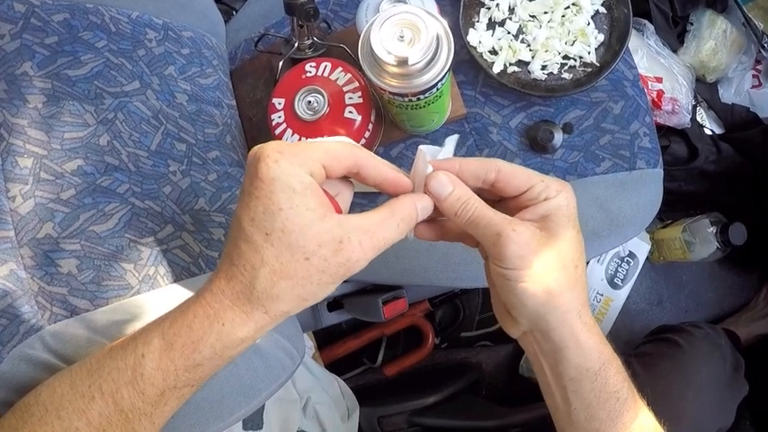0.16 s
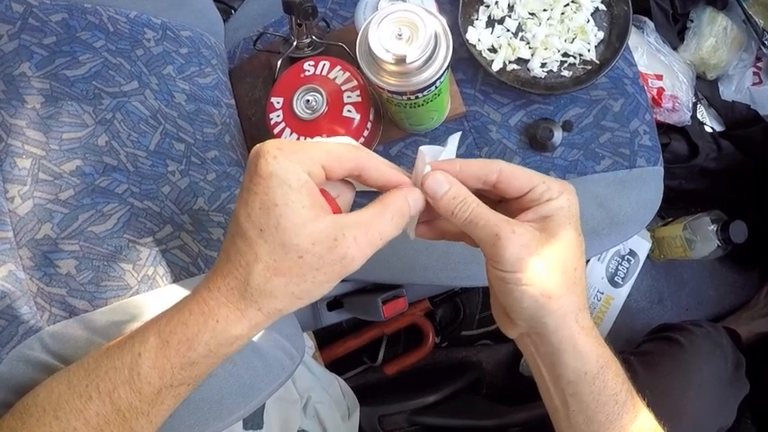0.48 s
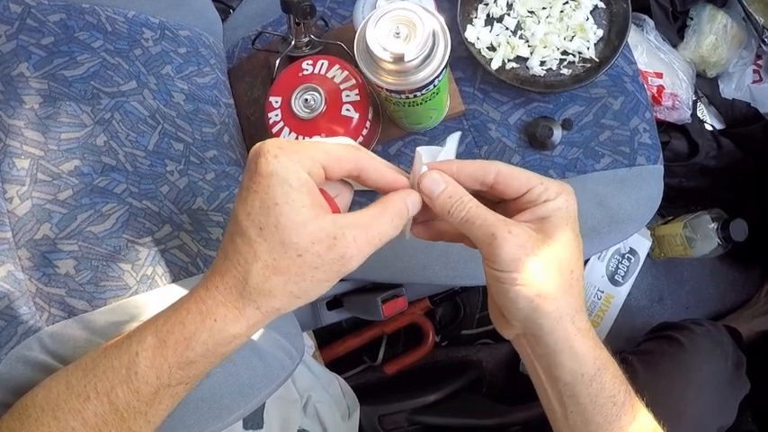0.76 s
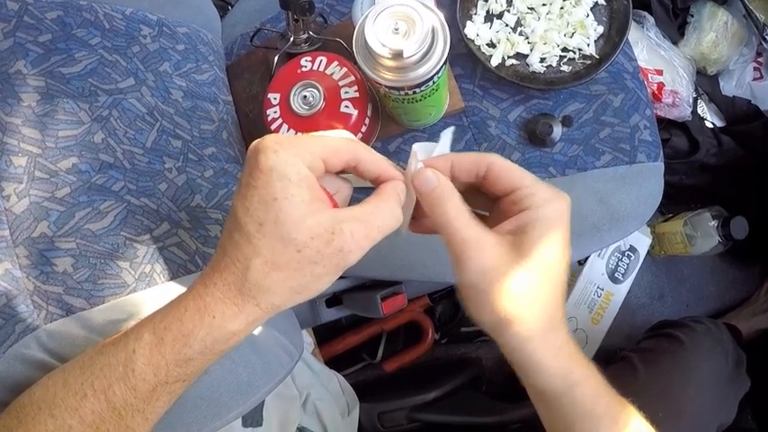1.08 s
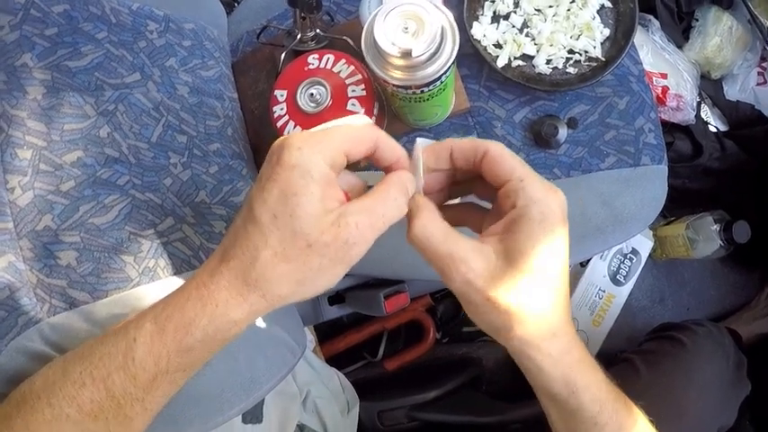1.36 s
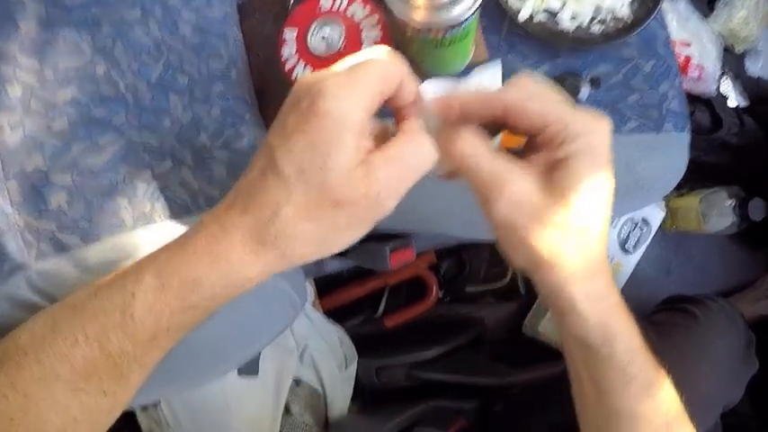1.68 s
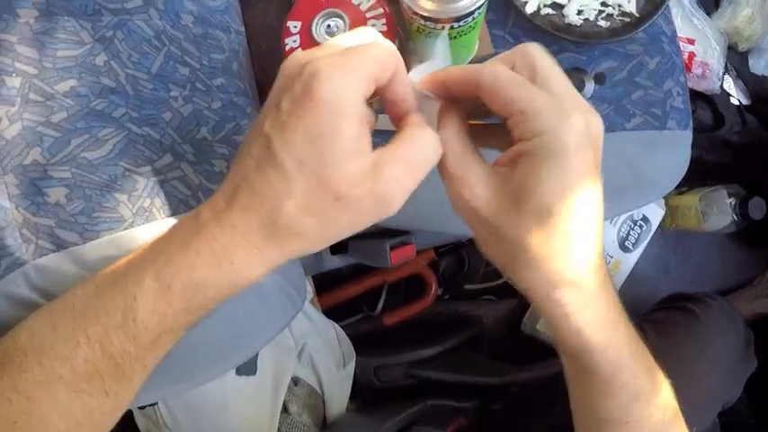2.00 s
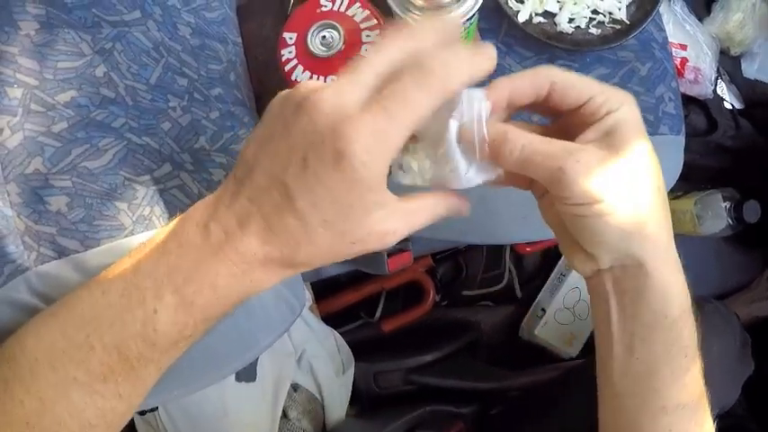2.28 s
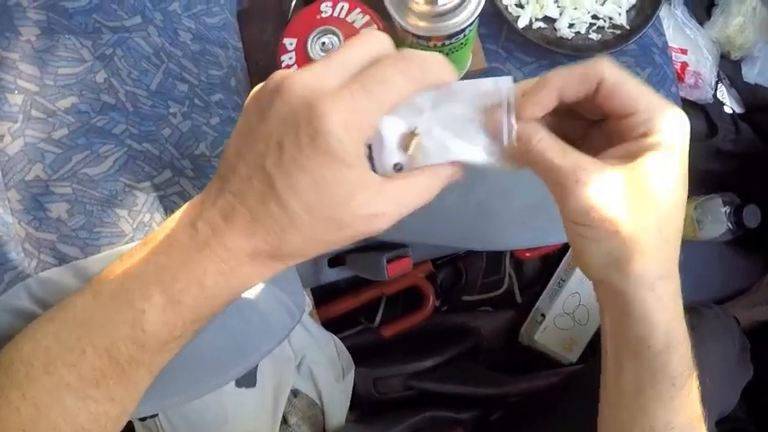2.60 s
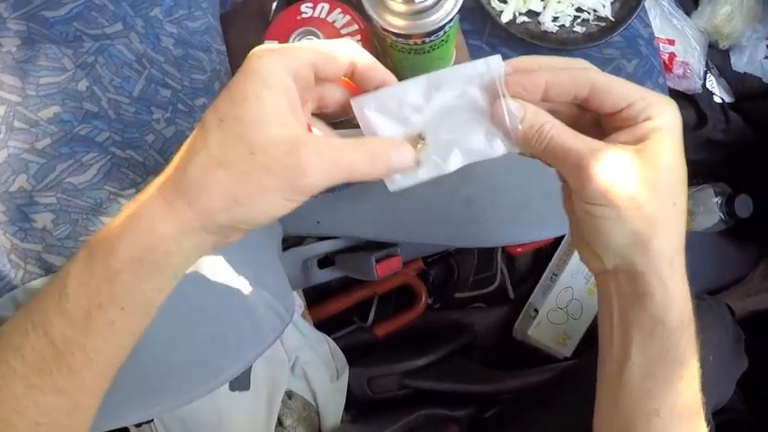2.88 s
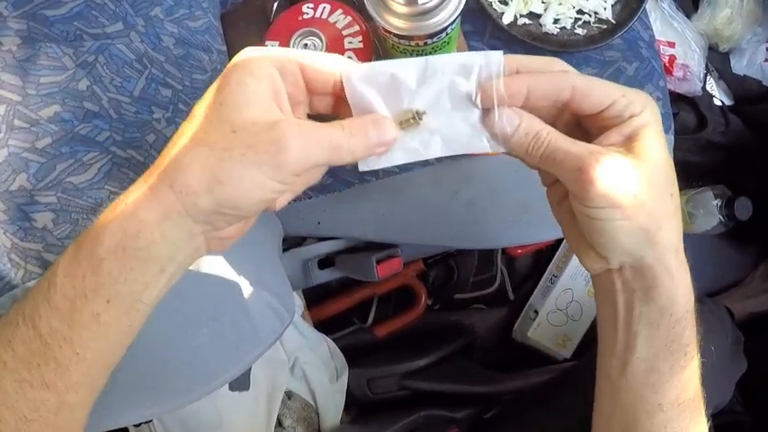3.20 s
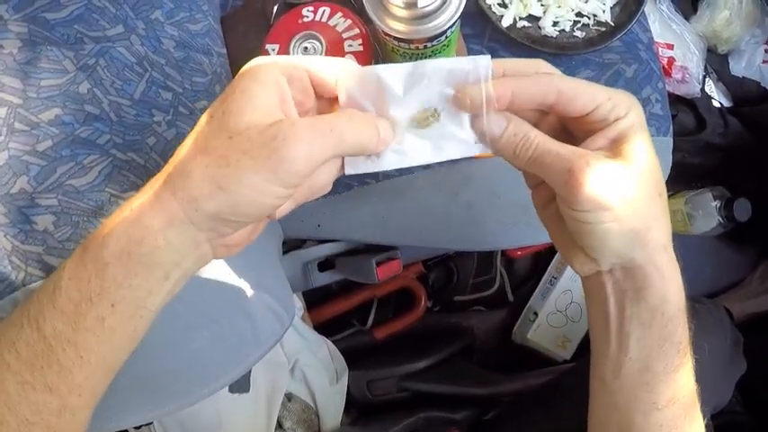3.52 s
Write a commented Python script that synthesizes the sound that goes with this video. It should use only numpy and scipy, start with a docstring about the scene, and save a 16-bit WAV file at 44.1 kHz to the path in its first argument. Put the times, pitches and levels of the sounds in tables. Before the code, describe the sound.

Thin plastic film crackles in short, bright snaps as fingers peel open and stretch a little packet.

```python
"""A small plastic packet is picked at, peeled open and stretched flat by fingers inside a parked car.
Its film buckles in short snaps: bursts of slips ring the creases and die quickly in the upholstered cabin.
Fingertips rub and slide (showers of tiny slips), bump (soft buckles) and thud (damped low rings); a crease pings.
Underneath lie a faint hiss and outside noise (coloured noise), a low throb like a far idling engine
(two wavering sines) and air stirring at the microphone (very low noise)."""
import sys
import numpy as np
from scipy import signal
from scipy.fft import rfft, irfft
from scipy.io import wavfile

SR = 44100
rng = np.random.default_rng(int(sys.argv[2]) if len(sys.argv) > 2 else 0)


def digitize_waveform(pressure):
    """Quantize a signal to 16-bit integers and store it at the path in sys.argv[1].

    Rows of a 2-D input are taken as channels; values are limited to [-1, 1].
    """
    field = np.atleast_2d(pressure).T
    bounded = np.clip(field, -1, 1)
    quanta = np.round(bounded * 32767).astype(np.int16)
    wavfile.write(sys.argv[1], SR, quanta)


N = 160965  # length in samples

# Levels in the tables are relative: the *_DB settings below raise or lower whole layers.
# colour of the steady hiss: f/Hz, level/dB
HISS_COLOUR = [(2500, -21), (3500, -21.5), (4400, -17.5), (5400, -4.5), (7300, -0.5), (10000, -9),
               (12500, -24.5), (15500, -26)]
# colour of the outside noise: f/Hz, level/dB
OUTSIDE_COLOUR = [(110, 4), (160, -2.5), (220, -3), (330, -7), (550, -13), (950, -5), (1250, -12),
                  (1700, -17), (2500, -30)]
# faint wavering tones in the outside noise: f/Hz
STREAK_TONES = [732, 929, 1064, 1270]
# course of the low throb: t/s, level of the fundamental/dB, level of the octave/dB
THROB_COURSE = [(0.0, -46, -56.5), (0.41, -54, -76), (2.39, -48.5, -58), (2.68, -52, -65.5),
                (3.12, -45, -53.5), (3.6, -42.5, -57), (3.65, -51, -49)]
# colour of the air stirring at the microphone: f/Hz, level/dB
AIR_COLOUR = [(6, -10.5), (12, -2.5), (22, -9.5), (45, -12), (62, -29), (130, -42)]
# course of skin rubbing on the film: t/s, level of the dull scuff/dB, level of the fine crackle/dB
RUB_COURSE = [(1.0, -90, -84), (1.11, -68, -77), (1.51, -79, -72.5), (1.64, -94, -86), (1.78, -64, -68),
              (1.91, -56, -56.5), (2.01, -51, -56), (2.17, -72, -69), (2.31, -61.5, -55), (2.46, -55, -57),
              (2.58, -57, -58), (2.76, -64, -61), (2.87, -52.5, -62), (2.98, -64, -62), (3.06, -63, -79),
              (3.19, -57.5, -52), (3.24, -59, -66), (3.38, -62.5, -66), (3.49, -55.5, -49.5),
              (3.61, -57.5, -63), (3.65, -66, -90)]
# colour of the dull scuff: f/Hz, level/dB
SCUFF_COLOUR = [(110, -3.5), (170, 0.5), (260, -3), (400, -0.5), (550, 1), (750, -2.5), (900, -1),
                (1200, -6), (1700, -8.5), (2800, -27.5)]
# colour of the fine crackle: f/Hz, level/dB
CRACKLE_COLOUR = [(1400, -8), (2600, -12.5), (4200, -0.5), (5300, -5.5), (8000, -7.5), (11000, -15.5),
                  (15000, -19)]
# airy rustles of film sliding between fingertips: middle t/s, half length t/s, level/dB
SLIDE_EVENTS = [(0.541, 0.009, -60.5), (1.36, 0.048, -58)]
# colour of the slides: f/Hz, level/dB
SLIDE_COLOUR = [(5000, 2), (10000, 0), (13000, 0), (15000, -5)]
# dull thuds of the finger pads: t/s, f/Hz, level/dB
THUD_EVENTS = [(0.675, 348, -54), (0.715, 485, -56.5), (0.753, 485, -57), (1.105, 483, -47.5),
               (1.15, 515, -57), (1.285, 980, -54), (1.315, 336, -48.5), (1.474, 540, -53),
               (2.356, 726, -45), (2.435, 610, -33), (2.86, 410, -32.5), (2.996, 544, -36.5),
               (3.117, 510, -43), (3.207, 935, -39)]
# soft bumps and small ticks under the fingers: t/s, then level/dB in the body, mid and ring bands
BUMP_EVENTS = [(1.102, -57, -53, -59), (1.154, -65, -58.5, -80), (1.197, -51, -42, -49.5),
               (1.316, -52.5, -55, -68), (1.329, -57, -57, -63), (1.52, -70, -60, -62),
               (1.561, -60, -56, -62), (1.606, -60, -55, -67), (1.769, -77, -56, -73),
               (1.825, -59, -48, -45), (2.011, -48, -40, -43), (2.036, -51, -50, -72),
               (2.049, -46, -43, -49), (2.205, -50, -55, -58), (2.307, -44.5, -51, -45.5),
               (2.366, -54, -49, -58), (2.515, -66, -43, -52), (2.619, -67, -51.5, -50),
               (2.694, -54, -53, -55), (2.712, -45.5, -45, -47), (2.768, -43.5, -45, -50),
               (2.795, -58, -57, -57), (2.819, -57, -56, -50), (2.867, -53, -58, -66),
               (2.9569, -41.5, -49, -46), (3.142, -40.5, -50, -43), (3.247, -66, -49.5, -57),
               (3.309, -58, -62, -57), (3.422, -53, -58, -54), (3.516, -39.5, -49, -44),
               (3.519, -39, -48, -45), (3.532, -44, -45.5, -45)]
# snaps of the film: t/s, buckling time/ms, ring f/Hz, then level/dB in the body, mid, ring, bright and top bands
SNAP_EVENTS = [(0.347, 0.31, 5150, -63, -51, -42, -45.5, -50),
               (0.3732, 0.64, 5060, -66, -54, -50.5, -48, -51),
               (0.3951, 0.95, 7540, -64, -76, -48.5, -44, -48),
               (0.8321, 0.16, 5000, -79, -59.5, -52, -54, -53.5),
               (0.8794, 1.9, 4400, -68, -73, -54, -53, -53), (1.0846, 2.7, 4970, -65, -64, -56, -64, -74),
               (1.2086, 3.3, 4270, -50.5, -47.5, -48, -57, -60),
               (1.38, 0.41, 4800, -58, -48.5, -47.5, -44.5, -40.5),
               (1.6786, 1.6, 4760, -47.5, -41, -32, -29.5, -31.5),
               (1.7042, 0.25, 5130, -68, -55.5, -28.5, -33, -40),
               (1.7284, 0.33, 4180, -69, -61, -52, -53, -58),
               (1.8163, 0.21, 3900, -61, -65, -48.5, -41.5, -40.5),
               (1.8427, 1.1, 4170, -63, -41.5, -36.5, -40, -52),
               (1.86, 0.69, 4450, -46.5, -43, -34, -60, -55),
               (1.8649, 0.58, 5500, -51, -40.5, -48, -41, -44),
               (1.8765, 0.74, 5900, -50, -42, -35, -43, -48),
               (1.9459, 0.69, 4900, -51.5, -47, -49.5, -66, -76),
               (1.9551, 6, 5000, -68, -52, -44.5, -49.5, -69),
               (1.9875, 2.8, 4860, -50, -40.5, -38.5, -43, -51),
               (1.9943, 2.6, 4400, -52, -43, -40, -41, -46),
               (2.058, 0.59, 4940, -78, -55, -50.5, -47.5, -52),
               (2.0774, 0.27, 4250, -44, -45.5, -49, -51, -59),
               (2.086, 10, 4900, -55, -47.5, -41, -51, -53), (2.11, 1.2, 3980, -42.5, -41.5, -39, -42, -49),
               (2.1363, 0.26, 4500, -51, -49, -40, -61, -62),
               (2.2295, 1.9, 5500, -58, -51.5, -44.5, -45.5, -43),
               (2.2757, 0.15, 3210, -78, -59, -47, -56, -60),
               (2.3735, 2.6, 4750, -53, -71, -51.5, -53.5, -71), (2.3905, 1, 5300, -52, -43, -37, -48, -55),
               (2.418, 2.6, 4970, -46, -46, -41.5, -48.5, -51),
               (2.4298, 0.58, 4300, -42.5, -46, -37.5, -45.5, -59),
               (2.4446, 2.4, 5540, -40, -38.5, -37, -40, -40),
               (2.4588, 0.56, 4300, -34.5, -41.5, -34, -47.5, -62),
               (2.4738, 0.4, 4350, -37.5, -31.5, -21.5, -26.5, -30.5),
               (2.4785, 0.51, 4190, -36, -54, -43, -46, -48), (2.4845, 0.33, 5900, -57, -47, -35, -42, -39),
               (2.4888, 0.88, 4900, -52, -40.5, -27.5, -31.5, -46),
               (2.498, 0.34, 3960, -36, -36.5, -37, -56, -48),
               (2.522, 1.6, 4500, -74, -46, -42.5, -62, -69),
               (2.5686, 2.2, 4170, -51, -51, -48.5, -74, -76), (2.5844, 1.1, 6050, -58, -57, -60, -55, -54),
               (2.6825, 0.49, 3850, -75, -55, -48.5, -49.5, -48),
               (2.7059, 1.1, 4670, -55, -58, -51, -52, -52),
               (2.7265, 0.66, 5300, -45.5, -42.5, -40.5, -41.5, -46),
               (2.7383, 0.94, 4030, -44.5, -46.5, -42.5, -52, -64),
               (2.752, 1.3, 4000, -53, -41.5, -37.5, -38.5, -38.5),
               (2.755, 2.2, 4070, -43, -45.5, -39, -39, -51), (2.833, 0.53, 4150, -47, -49, -48, -62, -62),
               (2.8604, 0.54, 4470, -45, -44, -43, -44.5, -47),
               (2.886, 1.5, 3630, -41.5, -45, -33.5, -45.5, -52),
               (2.9121, 1.8, 6000, -56, -52, -39.5, -39.5, -54),
               (2.942, 1.2, 3800, -52, -52, -44, -70, -75), (2.952, 0.42, 4260, -51, -51, -57, -53, -51),
               (2.9657, 0.33, 5200, -50, -51, -43.5, -43, -55),
               (2.9723, 0.49, 4400, -48.5, -46, -43, -61, -63),
               (3.0116, 2.4, 4400, -39.5, -36.5, -34.5, -37.5, -47),
               (3.0247, 0.25, 4200, -45, -43.5, -39, -51, -61),
               (3.034, 1.3, 4350, -52, -43.5, -34.5, -40, -50),
               (3.1502, 0.7, 4200, -49, -45.5, -29.5, -38, -43),
               (3.1627, 1, 4950, -39, -36, -26.5, -31, -27),
               (3.203, 0.62, 4200, -53, -50, -45.5, -48.5, -58),
               (3.2855, 0.56, 4770, -56, -54, -51, -57.5, -71),
               (3.395, 2.1, 4270, -46, -43, -30.5, -32.5, -28.5),
               (3.454, 0.6, 5800, -58, -44.5, -32.5, -35, -42),
               (3.5732, 2.5, 4360, -56, -50.5, -43, -50.5, -64),
               (3.6061, 0.41, 4400, -73, -58, -44, -50, -58)]
# edges of the body, mid, ring, bright and top bands: low f/Hz, high f/Hz
BAND_EDGES = [(265, 1000), (1000, 2700), (3400, 6300), (6300, 10000), (10000, 15500)]
# the cabin's answer in each band: time to fall by 60 dB t/s, level against the direct snap/dB, band trim level/dB
CABIN_BANDS = [(0.035, -2.5, -0.5), (0.058, 2.5, -1.5), (0.057, -5.5, 0.5), (0.053, -3, 2),
               (0.045, -6, -1.5)]
# resonances shared by the whole packet, shifted a little at each buckle: f/Hz, width f/Hz, level/dB
FILM_MODES = [(4200, 1900, -7), (7870, 570, 12), (10660, 170, -9.5), (12400, 420, 4)]
# low resonances of the hands and the cabin around them, alike at every buckle: f/Hz, width f/Hz, level/dB
HOLLOW_MODES = [(351, 43, 5), (515, 94, 7.5), (743, 147, 11), (1058, 142, 4), (1183, 100, 3), (1436, 77, 6)]

HISS_DB, OUTSIDE_DB, STREAK_DB, AIR_DB = -63, -69.5, -83, -47
SWELL_DB, SWELL_HZ = 2.5, 1.7  # size and speed of the swell in the outside noise
STREAK_WIDTH_HZ = 16
THROB_HZ, THROB_DB = 38.2, 2.5
THROB_PAN_DB, AIR_PAN_DB = -5.5, -34  # left minus right

SCUFF_DB, SCUFF_PER_S, SCUFF_SPREAD_DB = -5.5, 700, 3
CRACKLE_DB, CRACKLE_PER_S, CRACKLE_SPREAD_DB = -3.5, 420, 6.5
RUB_ECHO_DB, RUB_ECHO_DECAY_S = -2.5, 0.019
SLIDE_PER_S = 1900
THUD_ATTACK_S, THUD_DECAY_S = 0.00041, 0.006
THUD_ROUGH = 0.75  # share of rough ring against one share of pure tone
PING_S, PING_HZ, PING_T60_S, PING_DB = 2.391, 2100, 0.03, -36

BUMP_MS, BUMP_HZ, BUMP_DB = 3.1, 4400, 21.5
SNAP_DB = 26.5
FIRST_SLIP = 0.44  # strength of the opening slip in a short buckle
RUN_SPREAD_DB = 2  # unevenness of the small slips after it
RING_WIDTH_HZ, RING_DB = 580, 10  # the buckling crease's own resonance
FILM_SPREAD = 0.061  # random shift of the film's resonances, as a fraction of pitch
CABIN_ONSET_S, CABIN_SPREAD_DB = 0.0018, 3.5  # build-up and unevenness of the reflections
SIDE_DB, SIDE_HZ, SIDE_DECAY_S = -11.5, 307, 0.0016  # low reflections that add width
CEILING = 0.33  # level at which the recorder rounds the peaks
TOP_HZ = 15200


def amp(db):
    """Turn decibels into a gain."""
    return 10 ** (np.asarray(db) / 20)


def unit(x):
    """Scale a sound to an energy of one."""
    return x / np.sqrt(np.sum(x ** 2) + 1e-18)


def curve(table, column):
    """Gain over time, drawn in straight dB lines through one column of a table."""
    rows = np.array(table)
    return amp(np.interp(np.arange(N) / SR, rows[:, 0], rows[:, column]))


def colour(x, points):
    """Filter through (f/Hz, level/dB) points with steep skirts, never acting ahead of time; the rms becomes 1."""
    hz, db = np.array(points).T
    log_f = np.log(np.maximum(np.fft.rfftfreq(2 * N, 1 / SR), 1))
    below = np.maximum(np.log(hz[0]) - log_f, 0)
    above = np.maximum(log_f - np.log(hz[-1]), 0)
    level_db = np.interp(log_f, np.log(hz), db) - np.minimum(40 * (below + above), 70)
    # folding the cepstrum (the spectrum of the log gain) makes the filter act only forwards in time
    cepstrum = irfft(np.log(amp(level_db)))
    cepstrum[1:N] *= 2
    cepstrum[N + 1:] = 0
    response = np.exp(rfft(cepstrum))
    return unit(irfft(rfft(x, 2 * N) * response)[:N]) * np.sqrt(N)


def noise(points):
    """Coloured noise of rms 1."""
    return colour(rng.standard_normal(N), points)


def wander(hz):
    """Random drift of rms 1, made mostly of changes slower than hz."""
    f = np.fft.rfftfreq(N, 1 / SR)
    smooth = irfft(rfft(rng.standard_normal(N)) * np.exp(-(f / hz) ** 2), N)
    return unit(smooth) * np.sqrt(N)


def grains(per_s, spread_db):
    """Tiny slips at random moments, most weak and a few strong."""
    size = amp(spread_db * np.minimum(rng.exponential(size=N), 4))
    happens = rng.random(N) < per_s / SR
    return happens * size * rng.choice([-1, 1], N)


def resonance(size, hz, width, db):
    """Frequency response of one damped resonance, with its peak at the given level."""
    s = 1j * np.fft.rfftfreq(size, 1 / SR)
    return amp(db) * s * width / (s ** 2 + s * width + hz ** 2)


def pan(x, db):
    """Place a sound by its left-minus-right level."""
    gains = amp(np.array([[db], [-db]]) / 2)
    return x * gains / gains.mean()


def add(out, start_s, x):
    """Mix a sound in at its time."""
    i = int(start_s * SR)
    out[i:i + len(x)] += x[:max(N - i, 0)]


def hiss():
    """Steady noise shaped into a faint hiss."""
    return amp(HISS_DB) * noise(HISS_COLOUR)


def outside():
    """Faint outside noise that swells and sinks, with a few wavering tones in it."""
    t = np.arange(N) / SR
    streaks = np.zeros(N)
    for hz in STREAK_TONES:
        waver = wander(STREAK_WIDTH_HZ) + 1j * wander(STREAK_WIDTH_HZ)  # drifts in strength and phase
        streaks += np.real(waver * np.exp(2j * np.pi * hz * t))
    swell = amp(OUTSIDE_DB + SWELL_DB * wander(SWELL_HZ))
    return swell * noise(OUTSIDE_COLOUR) + amp(STREAK_DB) * streaks


def throb():
    """A low tone and its octave, like a far idling engine, with a slightly unsteady pitch."""
    pitch = THROB_HZ * (1 + 0.022 * noise([(1, 1.5), (5, -3.5)]))
    phase = 2 * np.pi * np.cumsum(pitch) / SR
    fundamental = curve(THROB_COURSE, 1) * np.sin(phase)
    octave = curve(THROB_COURSE, 2) * np.sin(2 * phase)
    return pan(amp(THROB_DB) * (fundamental + octave), THROB_PAN_DB)


def air():
    """Slow buffets of air at the microphone: very low noise, almost all on the right."""
    return pan(amp(AIR_DB) * noise(AIR_COLOUR), AIR_PAN_DB)


def rubbing():
    """Skin sticks and slips on the film: a dull scuff and fine crackle, echoed by the cabin."""
    t = np.arange(N) / SR
    touching = np.clip((t - RUB_COURSE[0][0]) * 10, 0, 1)  # fades in over a tenth of a second
    scuff = colour(grains(SCUFF_PER_S, SCUFF_SPREAD_DB), SCUFF_COLOUR)
    crackle = colour(grains(CRACKLE_PER_S, CRACKLE_SPREAD_DB), CRACKLE_COLOUR)
    scuff = amp(SCUFF_DB) * curve(RUB_COURSE, 1) * scuff
    crackle = amp(CRACKLE_DB) * curve(RUB_COURSE, 2) * crackle
    rub = touching * (scuff + crackle)
    cabin = unit(rng.standard_normal(N) * np.exp(-t / RUB_ECHO_DECAY_S))
    return rub + amp(RUB_ECHO_DB) * signal.fftconvolve(rub, cabin)[:N]


def slides():
    """Film slides between the fingertips: dense tiny slips make thin, airy rustles that rise and fall."""
    t = np.arange(N) / SR
    swell = np.zeros(N)
    for middle, half_length, db in SLIDE_EVENTS:
        swell += amp(db) * np.exp(-((t - middle) / half_length) ** 2)
    return swell * colour(grains(SLIDE_PER_S, SCUFF_SPREAD_DB), SLIDE_COLOUR)


def thuds(size=4096):
    """A finger pad lands on the film: a low, rough ring that the skin damps at once."""
    t = np.arange(size) / SR
    envelope = (1 - np.exp(-t / THUD_ATTACK_S)) * np.exp(-t / THUD_DECAY_S)
    envelope /= envelope.max()
    out = np.zeros(N)
    for start, hz, db in THUD_EVENTS:
        tone = np.sin(2 * np.pi * hz * t)
        rough = irfft(rfft(rng.standard_normal(size)) * resonance(size, hz, hz, 0) ** 2)
        rough = unit(rough) * np.sqrt(size)
        ring = (tone + THUD_ROUGH * rough) / (1 + THUD_ROUGH)
        add(out, start, amp(db) * envelope * ring)
    return out


def ping():
    """One taut crease pings as the packet opens: a short, clear, fading tone."""
    age = np.maximum(np.arange(N) / SR - PING_S, 0)
    return amp(PING_DB) * np.sin(2 * np.pi * PING_HZ * age) * amp(-60 * age / PING_T60_S)


def film_response(size, ring_hz):
    """Frequency response of the crease, the packet's film and the hollow around the hands."""
    response = 1 + resonance(size, ring_hz, RING_WIDTH_HZ, RING_DB)
    for mode in HOLLOW_MODES:
        response = response + resonance(size, *mode)
    for hz, width, db in FILM_MODES:
        shifted_hz = hz * np.exp(FILM_SPREAD * rng.standard_normal())
        response = response + resonance(size, shifted_hz, width, db)
    return response


def buckle(length_ms, ring_hz, levels_db, size=6144):
    """One crease gives way: a slip and a quick run of smaller ones ring the film, then the cabin answers."""
    t = np.arange(size) / SR
    age = 1000 * t / max(length_ms, 0.15)
    uneven = amp(RUN_SPREAD_DB * rng.standard_normal(size))
    run = rng.choice([-1, 1], size) * uneven * np.exp(-age ** 1.5)
    slips = unit(run) + FIRST_SLIP * (t == 0) / max(length_ms, 1)  # slow buckles start more softly
    film = film_response(size, ring_hz)
    crack = irfft(rfft(slips) * film)

    strength = np.repeat(rng.standard_normal(size // 32), 32)  # one strength per 32 samples
    reflections = rng.standard_normal(size) * amp(CABIN_SPREAD_DB * strength)
    build_up = 1 - np.exp(-(t / CABIN_ONSET_S) ** 2)
    scatter = irfft(rfft(reflections) * film) * build_up

    out = np.zeros(size)
    # zip stops at the last level given, so bumps use only the lowest three bands
    for db, edges, (t60, room_db, trim_db) in zip(levels_db, BAND_EDGES, CABIN_BANDS):
        band = signal.butter(3, edges, "band", fs=SR, output="sos")
        fade = amp(-60 * t / t60)
        direct, echo = signal.sosfilt(band, [crack, scatter * fade])
        out += amp(db + trim_db) * unit(unit(direct) + amp(room_db) * unit(echo))
    return out


def bumps():
    """Fingers bump the packet: soft buckles of one length and pitch, without the two highest bands."""
    out = np.zeros(N)
    for start, *levels_db in BUMP_EVENTS:
        add(out, start, amp(BUMP_DB) * buckle(BUMP_MS, BUMP_HZ, levels_db))
    return out


def snaps():
    """The film snaps: each crease buckles with its own length, pitch and band levels."""
    out = np.zeros(N)
    for start, length_ms, ring_hz, *levels_db in SNAP_EVENTS:
        add(out, start, amp(SNAP_DB) * buckle(length_ms, ring_hz, levels_db))
    return out


def window_reflections(hands):
    """Short, low reflections from the windows."""
    windows = unit(rng.standard_normal(N) * np.exp(-np.arange(N) / SR / SIDE_DECAY_S))
    low = signal.butter(2, SIDE_HZ, fs=SR, output="sos")
    return amp(SIDE_DB) * signal.sosfilt(low, signal.fftconvolve(hands, windows)[:N])


def scene():
    """The hands work straight in front of the microphone; the windows add a trace of width."""
    background = hiss() + outside() + throb() + air()
    hands = rubbing() + slides() + thuds() + ping() + bumps() + snaps()
    side = window_reflections(hands)
    return np.array([hands + side, hands - side]) + background  # opposite signs left and right give width


def record(dry):
    """The recorder rounds the sharpest peaks and cuts the top."""
    rounded = dry / (1 + (dry / CEILING) ** 4) ** 0.25
    top_cut = signal.ellip(8, 0.2, 70, TOP_HZ, fs=SR, output="sos")
    return signal.sosfilt(top_cut, rounded)


dry = scene()
out = record(dry)
digitize_waveform(out)
```